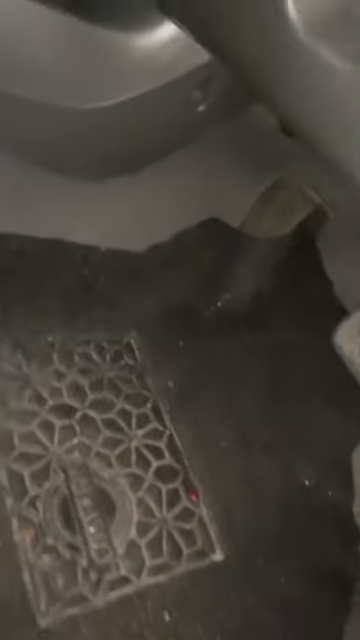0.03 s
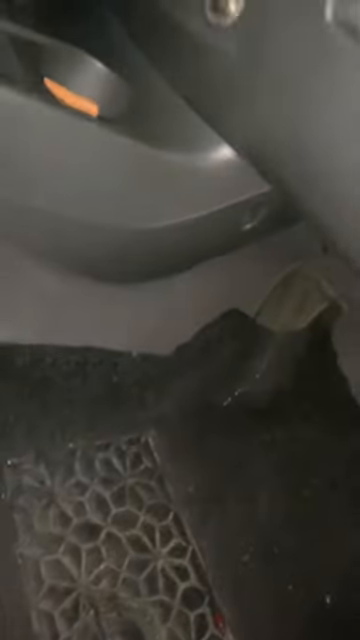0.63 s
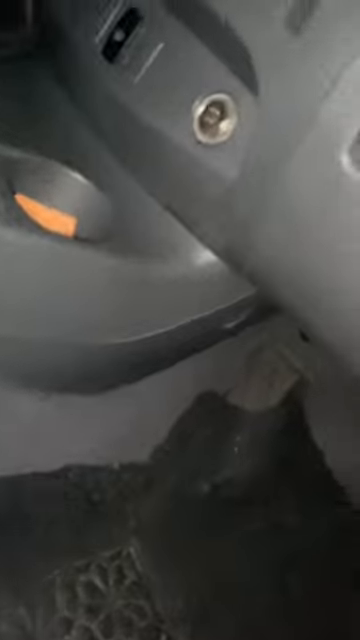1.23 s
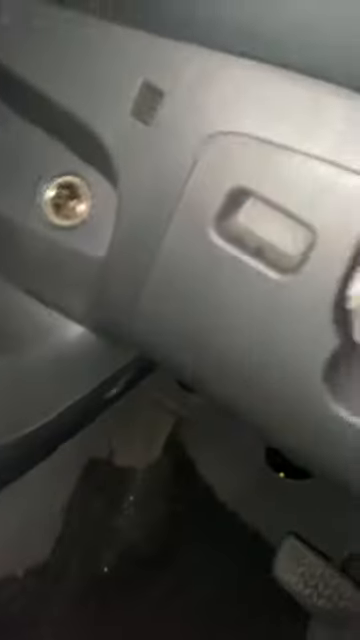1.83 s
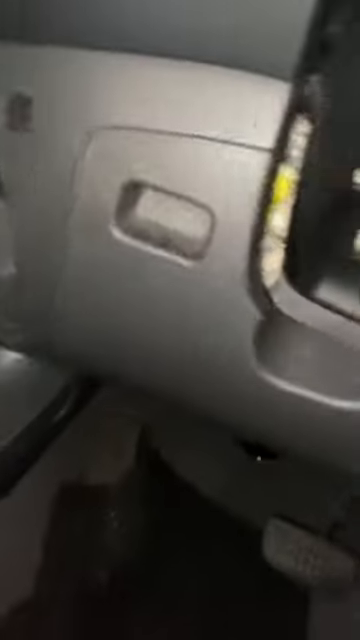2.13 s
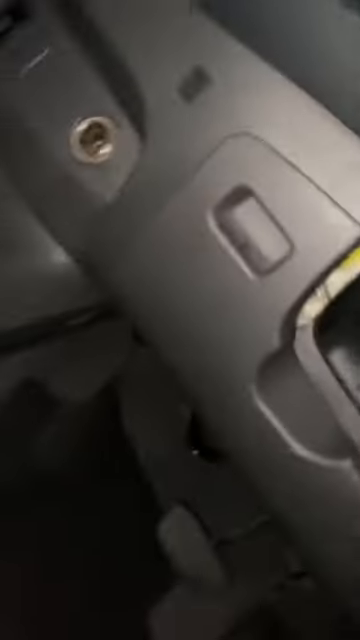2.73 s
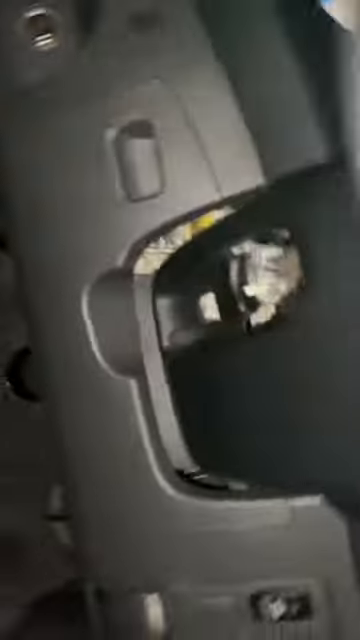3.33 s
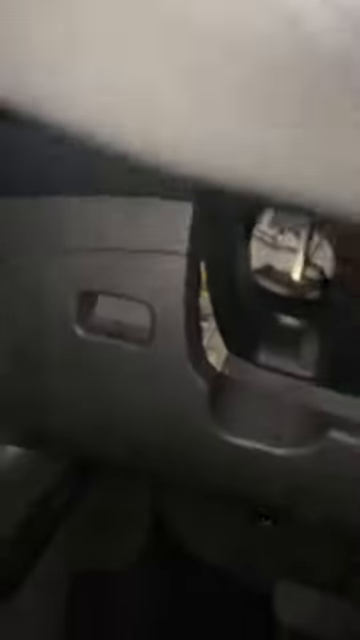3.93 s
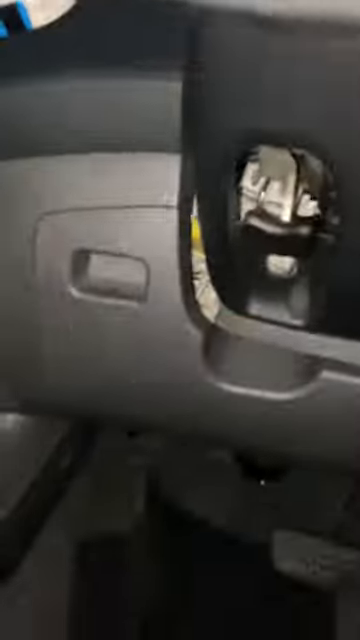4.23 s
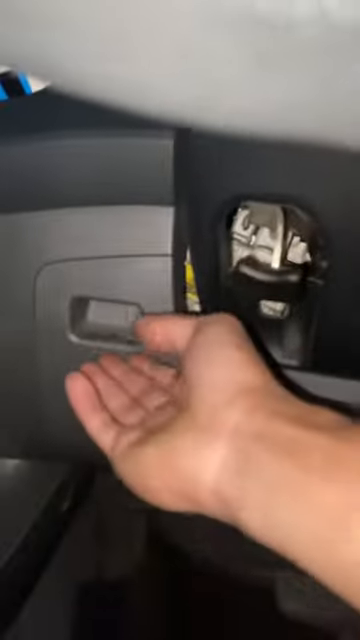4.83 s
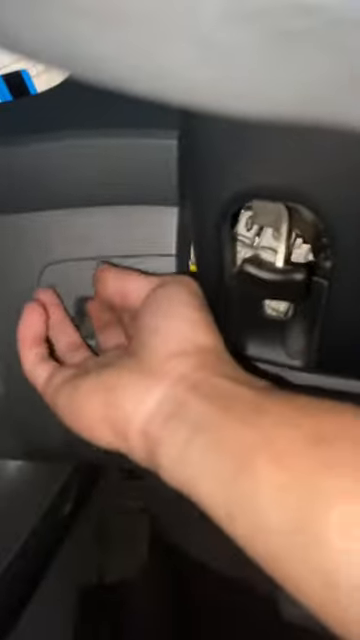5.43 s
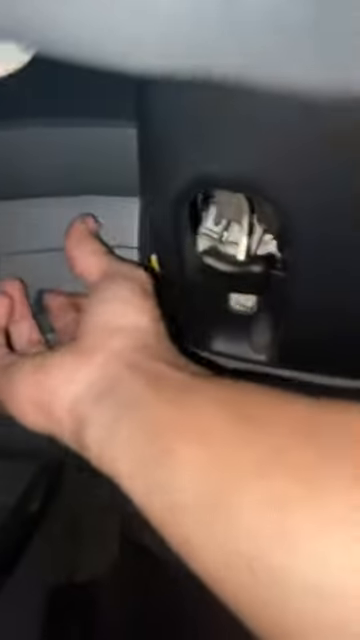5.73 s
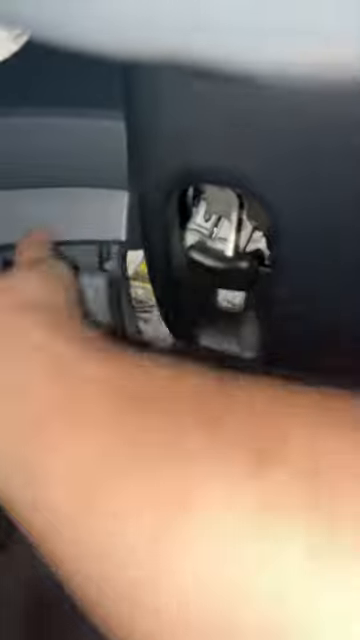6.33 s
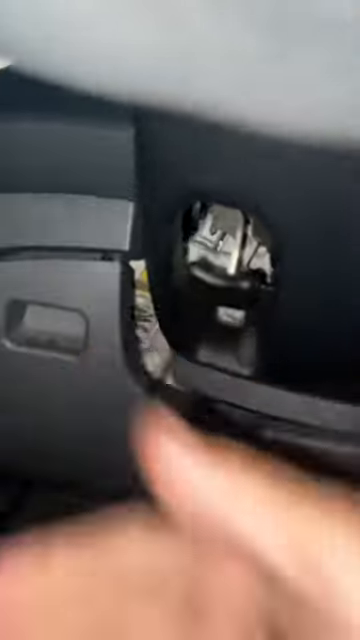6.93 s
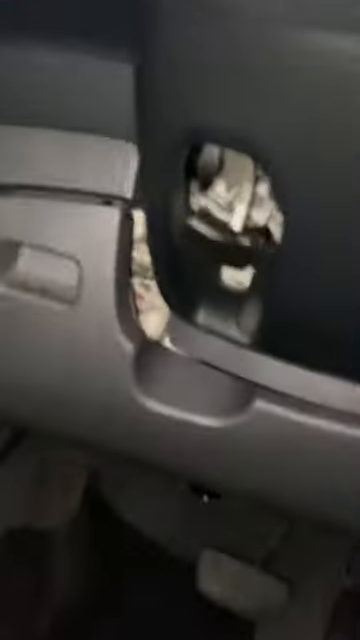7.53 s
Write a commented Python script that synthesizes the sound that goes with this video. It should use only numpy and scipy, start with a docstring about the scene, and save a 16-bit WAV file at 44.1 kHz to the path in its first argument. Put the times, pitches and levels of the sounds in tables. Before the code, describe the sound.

Inside a moving vehicle, a low engine boom sits over steady road rumble and tyre noise, with soft sleeve swishes and small trim ticks. The engine eases and a low drone swells. Fingers rub faintly on a plastic dash cover, which snaps out of its clips with a sharp clack, knocks against the hollow dash and clicks twice. The close, hand-held microphone picks up dull grip rubs and bumps.

```python
"""Inside a moving vehicle, by the driver's footwell. The engine's firing booms through the body over road
rumble and tyre noise, while a sleeve swishes and the trim ticks. By 3 s the engine has eased off and a
low drive-train drone is swelling. Near 5 s fingers rub a plastic dash cover; at 6.25 s it snaps out of
its clips, knocks against the hollow dash and clicks twice. Then the hand draws away.
A hand-held pair of close microphone ports picks it all up, with rubs and bumps of the grip."""
import sys
import numpy as np
from scipy import signal
from scipy.fft import rfft, irfft, next_fast_len
from scipy.io import wavfile
from scipy.ndimage import uniform_filter1d

SR = 44100
rng = np.random.default_rng(int(sys.argv[2]) if len(sys.argv) > 2 else 0)


def wav_record(signal):
    """Record a signal, one row per channel, as 16-bit PCM in the file named by sys.argv[1]."""
    frames = np.transpose(np.atleast_2d(signal))
    bounded = np.clip(frames, -1, 1)
    # unit amplitude maps onto the largest positive 16-bit level
    quanta = np.round(bounded * 32767).astype(np.int16)
    wavfile.write(sys.argv[1], SR, quanta)


N = 334719
TIME = np.arange(N) / SR

# tone of the floor rumble: f/Hz, level/dB
RUMBLE_EQ = [(15, -38), (28, -19), (42, 1.5), (55, 3.5), (70, 3.5), (95, 3), (125, -5.5), (155, -17.5),
             (210, -20), (300, -68), (600, -61.5)]
# smoother and coarser stretches of road: t/s, rumble level/dB, tyre level/dB
ROAD_SURFACE = [(0, -38.5, 0.54), (1.8, -36.5, 1), (3.2, -35.5, -0.2), (4, -35, 0), (4.75, -31.5, 2),
                (5.3, -33.5, 0.5), (6.1, -41, 4), (6.4, -33.5, 4), (6.9, -32, 1), (7.6, -33.5, 5.5)]
# tone of the tyre and wind noise: f/Hz, level/dB
TYRE_EQ = [(60, 0.5), (200, -2), (300, -5), (390, -10.5), (480, -7), (600, -8.5), (740, -14), (880, -14),
           (1120, -15.5), (1450, -18.5), (1900, -20), (2600, -20.5), (3200, -22), (4300, -25.5),
           (5200, -30.5), (6500, -31.5), (10000, -40.5), (13000, -40.5), (16000, -76)]
# tyre noise arriving from one side as the microphone turns: t/s, share/0-1
SIDE_SHARE = [(0, 0.46), (2.3, 0.2), (3.2, 0.19), (6.8, 0.37), (7.3, 0.48)]
# bands of tyre noise cancelled by a nearby surface: t/s, half length/s, f/Hz, width/oct, depth/0-1
TYRE_NOTCHES = [(1.76, 0.5, 3330, .2, 0.52), (1.75, 0.79, 500, 0.23, 0.39), (7.46, 0.4, 3170, 0.27, 0.5),
                (1.88, 0.064, 700, 0.59, 0.43), (2.22, 0.033, 640, 0.82, 1), (4.188, 0.013, 1200, 2, 0.95),
                (5.695, 0.043, 1800, 0.71, 0.84), (5.68, 0.06, 340, 0.3, .6), (7.38, 0.16, 325, 0.65, 0.68),
                (7.445, 0.052, 860, 0.82, 0.74)]
# partials of the drone: frequency ratio, level/dB
DRONE_PARTIALS = [(1, 0), (1.225, -5), (1.73, -11), (2.03, -10)]
# the firing boom comes and goes, builds under load and dies as the throttle lifts: t/s, level/dB
BOOM_ENVELOPE = [(.07, -31), (.17, -57), (.33, -51), (.43, -31.5), (.6, -58), (.73, -31.5), (.87, -32.5),
                 (1.11, -32), (1.21, -44), (1.37, -33.5), (1.54, -29.5), (1.72, -34), (2.16, -26.5),
                 (2.42, -29), (2.62, -33), (2.72, -51), (3, -80)]
# the boom's second harmonic: t/s, level/dB
HARMONIC_ENVELOPE = [(0, -48.5), (.7, -45.5), (1.1, -42.5), (1.5, -48.5), (1.63, -56.5), (1.9, -47),
                     (2.18, -45), (2.33, -67), (3.2, -72), (3.8, -71)]
# the grip tightens, rubbing the case and widening the image:
# t/s, rise/s, fall/s, rub level/dB, added spread/dB
GRIP_PRESSES = [(.71, 0.037, 0.048, -42.5, -7), (1.85, 0.085, .08, -49, 3.5),
                (2.27, 0.13, 0.11, -38.5, 9.5), (4.2, .025, 0.18, -53, 6), (5.668, 0.0051, 0.0095, -65, 59),
                (5.719, 0.051, 0.14, -56, 9), (6.42, 0.13, 0.23, -51, 6.5), (7.38, 0.12, 0.35, -35.5, 9)]
# the case creaks and bumps as the grip shifts: t/s, level/dB, tilt/(dB/oct)
CASE_BUMPS = [(1.571, -36, 0), (2.775, -35, 1), (4.09, -33, -3), (4.192, -26, -2), (4.332, -32, -2),
              (5.661, -22, -8), (6.371, -30, 2), (6.387, -40, 5), (6.522, -30, -2), (7.075, -32, -2),
              (7.17, -27, 1)]
# tone of the microphone's case: f/Hz, level/dB
CASE_EQ = [(20, -35), (45, -24), (70, -13), (100, 7), (140, 1.5), (200, -6), (300, -6.5), (700, -11.5),
           (1500, -19.5), (2400, -29), (4000, -65)]
# soft swishes of sleeve and air: t/s, level/dB, rise/s, fall/s, tilt/(dB/oct), spread/dB, grain/dB
SLEEVE_MOVES = [(.73, -42, 0.071, 0.079, -1, 1.5, 2), (.795, -37.5, 0.025, 0.077, 0, 1, 2.5),
                (.814, -36.5, 0.01, 0.012, -1.4, -1.5, 0), (.852, -39.5, 0.024, 0.0088, 0, 5, 4.5),
                (2.33, -49.5, 0.096, 0.078, 0.5, 4, 1.5), (2.5, -55.5, 0.033, 0.04, 6, 1, 3),
                (2.88, -50.5, 0.11, 0.11, 3, 1.5, 2), (3.7, -55, 0.38, 0.35, 0.5, .5, -3.5),
                (4.749, -50.5, 0.14, 0.16, -1, 0, 4), (5.848, -49, .069, 0.1, -1, 3, 3),
                (7.385, -58, .05, .015, 5, 4, 9), (7.401, -68, .49, .33, 0, 17, 1)]
# tone of the sleeve: f/Hz, level/dB
SLEEVE_EQ = [(100, -18), (300, 5.5), (450, 2), (650, 2.5), (900, -6), (1400, -1.5), (1900, -1),
             (2300, -5.5), (3200, -10.5), (3900, -5.5), (5700, -11), (8000, -17), (12500, -13.5),
             (16000, -31)]
# fingers rubbing on plastic: t/s, level/dB, rise/s, fall/s, f/Hz, width/oct
FINGER_RUBS = [(4.78, -57, 0.11, 0.13, 1600, 0.6), (4.9, -56, 0.23, 0.38, 3000, 0.36),
               (5.1, -61, .3, 0.43, 890, 0.25), (7.22, -61, 0.083, .08, 1990, 0.23),
               (7.36, -51, 0.029, 0.044, 2340, .4)]
# ticks of trim, fingernail and clips: t/s, level/dB, f/Hz, width/oct, t60/s, pan left/dB, snap level/dB
TRIM_TICKS = [(.5628, -31.5, 400, 0.65, 0.04, 3, -64), (.5635, -35, 1900, 0.42, 0.029, 4, -70),
              (1.31, -56, 11000, .5, .08, 0, -56), (1.384, -50, 10000, .66, 0.0041, 2, -46),
              (2.1467, -30.5, 620, 0.3, .07, 1, -58), (2.262, -36, 700, .4, .09, 0, -70),
              (2.805, -35, 500, .4, .05, 0, -62), (2.8056, -33, 1850, 0.45, 0.02, 3, -52),
              (4.078, -38, 1180, 1.3, 0.035, -6, -52), (4.182, -47, 7500, 0.46, .012, 4, -55),
              (4.2014, -41.5, 1000, 0.99, 0.054, -3, -60), (4.519, -45, 13200, .5, .02, -3, -50),
              (4.626, -46, 4970, 1, .02, -3, -53), (4.867, -43, 3400, 0.4, .025, -4, -65),
              (5.656, -34.5, 8240, 0.088, 0.01, 5, -49), (5.682, -53.5, 8100, .05, 0.66, 4, -40),
              (5.736, -49, 8300, .1, .02, 0, -52), (6.244, -44, 3500, 1, 0.068, 0, -55),
              (6.2648, -18, 1950, .3, .03, 0, -45), (6.316, -42, 4500, 1, .02, 9, -47),
              (6.343, -46, 5000, 1, .03, 0, -51), (6.422, -45, 2200, .8, .08, 0, -65),
              (6.4335, -39.5, 3400, .2, 0.053, 0, -50), (6.589, -48, 5000, .4, .08, 0, -62),
              (6.5982, -31, 2250, 0.22, 0.018, 0, -42), (6.5988, -31, 4950, 0.13, 0.024, -1, -35),
              (6.6035, -42, 4000, .8, .02, 0, -50), (6.6316, -32, 2500, 0.35, 0.022, -2, -42),
              (6.632, -38, 4900, .25, .035, -1, -48), (6.642, -43, 3500, .8, .025, 0, -54),
              (6.652, -37.5, 1680, .6, 0.04, 1, -68), (7.161, -39, 1500, 1.4, 0.056, 3, -50)]
# knocks of the loosened cover: t/s, level/dB, f/Hz, width/oct, pan left/dB
COVER_KNOCKS = [(6.2626, -30, 990, 0.26, 2), (6.274, -19, 148, 0.89, -7), (6.281, -25, 233, .4, 0),
                (6.325, -28, 950, .4, -2), (6.336, -22, 68, .6, 3), (6.4439, -23.5, 1150, 0.65, -5),
                (6.458, -28, 235, 1, 5)]
# modes of the loose cover over the hollow dash: f/Hz, level/dB, t60/s
HOLLOW_MODES = [(71.5, 1.5, 0.18), (124, -1, 0.087), (174, -8, 0.13), (218, 1.5, 0.065), (269.6, 0, 0.091),
                (996, -12, .06), (1100, -6, 0.048), (1306, -6, 0.04)]
# blows on the cover as its clips let go: t/s, level/dB, tilt/(dB/oct), ring trim/dB, pan left/dB
CLIP_BLOWS = [(6.252, -31, 0.5, 1, 14), (6.258, -14.5, -0.5, 0.5, -7), (6.265, -26, 2.5, -7, 0),
              (6.2691, -22, 1, -12, 9), (6.2745, -26, -2, -21, 1), (6.279, -25, -2, -18, 1),
              (6.323, -36, -1, -10, -8), (6.333, -36, -2, -15, 4), (6.433, -36, 0, -2, 0),
              (6.446, -32, -2.5, -18, -6)]
# modes of the cover and the dash behind it: f/Hz, level/dB, t60/s
PANEL_MODES = [(62, -14, .3), (123, -3.5, .12), (175, -12, .11), (222, -7, .11), (262, -14, .1),
               (384, -3.5, .07), (458, -1.5, .065), (535, -7, .06), (650, -10, .07), (810, -7.5, .1),
               (893, -13, .08), (996, -13, .11), (1107, -16, .08), (1351, -16, .08), (1558, -14, .09),
               (1805, -7, .07), (1926, -10.5, .07), (2374, -7, .07), (2734, -18, .08), (3018, -17, .08),
               (3782, -18, .07), (5620, -23, .05), (10455, -24, .07)]
# tone of the plastic's dense crack: f/Hz, level/dB
CRACK_EQ = [(30, -21), (70, -5), (130, 3.5), (400, 1.5), (1000, -6.5), (1400, -16), (2400, -8.5),
            (3500, -15.5), (5500, -18.5), (8000, -24), (12000, -20), (16000, -36)]
# response of the ports to the sum of the two sides: f/Hz, level/dB
MID_EQ = [(18, -31), (30, -4), (42, -1.5), (2000, -0.5), (3000, -2.5), (6200, -2.5), (7300, -17.5),
          (8600, -2.5), (10000, -3.5), (12100, -9), (13200, -33), (15500, -8)]
# response of the ports to the difference of the two sides: f/Hz, level/dB
SIDE_EQ = [(50, -37), (110, -35), (200, -12.5), (450, -1), (680, 0.5), (900, 5), (1900, -3.5), (2600, 0),
           (3800, -2), (4600, 0), (5300, -4.5), (7000, -0.5), (9300, -6), (10400, -45), (12300, -7.5)]


def amp(db):
    """Decibels to gain."""
    return 10 ** (np.asarray(db) / 20)


def unit(x):
    """Scales to an rms of one."""
    return x / np.sqrt(np.mean(x ** 2) + 1e-20)


def automation(rows):
    """The columns of a time table at every sample."""
    s, *columns = np.transpose(rows)
    return [np.interp(TIME, s, c) for c in columns]


def eq(points, hz):
    """An EQ curve in dB, drawn on a log-frequency axis."""
    f, db = np.transpose(points)
    return np.interp(np.log(hz + 1), np.log(f + 1), db)


def octaves(hz):
    """Octaves above one kilohertz."""
    return np.log2((hz + 1) / 1000)


def bell(hz, centre_hz, width):
    """One broad resonance in dB, its width in octaves."""
    return -20 * np.log10(1 + ((octaves(hz) - octaves(centre_hz)) / width) ** 2)


def colour(x, db_at):
    """Filters by a gain in dB given as a function of frequency."""
    size = next_fast_len(x.shape[-1] + 1024)
    gain = amp(db_at(np.fft.rfftfreq(size, 1 / SR)))
    return irfft(rfft(x, size) * gain, size)[..., :x.shape[-1]]


def noise(db_at, size=N):
    """Two unrelated channels of coloured noise, rms one."""
    return unit(colour(rng.standard_normal((2, size)), db_at))


def wander(rate_hz):
    """Slow random motion, rms one."""
    spectrum = rfft(rng.standard_normal(2048))
    hz = np.arange(len(spectrum)) / TIME[-1]
    slow = unit(irfft(spectrum * np.exp(-(hz / rate_hz) ** 2)))
    return np.interp(TIME, np.linspace(0, TIME[-1], len(slow)), slow)


def grains(t, depth_db, rate_hz):
    """The uneven catching and slipping of a surface, as a gain of rms one."""
    roughness = np.interp((t - t[0]) * rate_hz, np.arange(len(t)), rng.standard_normal(len(t)))
    return unit(amp(depth_db * np.clip(roughness, -2, 2)))


def attack(t, rise_s):
    """Eases in from zero to one."""
    return 1 - np.exp(-t / rise_s)


def decay(t, t60):
    """Falls by 60 dB in t60 seconds."""
    return np.exp(-np.log(1000) * t / max(t60, 1e-3))


def swell(t, rise, fall):
    """A rounded peak of height one at t = 0, with exponential flanks."""
    return np.exp(.4 - np.hypot(t / np.where(t < 0, rise, fall), .4))


def since(s):
    """Seconds gone by since a moment, zero before it."""
    return np.maximum(TIME - s, 0)


def ringing(t, modes, db_at):
    """Struck modes: damped sines of alternating polarity, weighted by frequency."""
    return sum(amp(db + db_at(hz)) * decay(t, t60) * np.sin(2 * np.pi * hz * t) * (-1) ** k
               for k, (hz, db, t60) in enumerate(modes))


def mid_side(x):
    """Turns left and right into mid and side, or back."""
    return np.array([x[0] + x[1], x[0] - x[1]]) / np.sqrt(2)


def widen(x, spread_db):
    """Sets the stereo width by trading mid against side."""
    mid, side = mid_side(x)
    spread = amp(spread_db)
    return mid_side([mid, side * spread]) * np.sqrt(2 / (1 + spread ** 2))


def from_right(x, share, delay_samples=8):
    """Part of the sound arrives from the right and reaches the left port late."""
    left = share * np.roll(x[1], delay_samples) + np.sqrt(1 - share ** 2) * x[0]
    return np.array([left, x[1]])


def add(mix, s, sound, pan_db=0):
    """Places a sound in the mix; pan is left minus right."""
    part = mix[:, round(s * SR):][:, :sound.shape[1]]
    part += sound[:, :part.shape[1]] * amp([[pan_db / 2], [-pan_db / 2]])


def road_rumble(compression=0.56):
    """The road shakes the floor and the cabin air booms."""
    bed = noise(lambda hz: eq(RUMBLE_EQ, hz))
    envelope = np.sqrt(np.abs(uniform_filter1d(bed.sum(0) ** 2, size=6000)) + 1e-9)
    return np.sqrt(2) * amp(automation(ROAD_SURFACE)[0]) * unit(bed / envelope ** compression)


def band_drift(x, depth_db=.9, rate_hz=9):
    """Each band of a noise swells and sinks a little on its own."""
    centres, size = np.linspace(-3, 4, 12), next_fast_len(N)
    spectrum, hz = rfft(x, size), np.fft.rfftfreq(size, 1 / SR)
    octave = np.clip(octaves(hz), centres[0], centres[-1])
    bands = (np.maximum(1 - abs(octave - c) / (centres[1] - centres[0]), 0) for c in centres)
    return sum(irfft(spectrum * band, size)[:, :N] * amp(depth_db * wander(rate_hz)) for band in bands)


def surface_notches(x):
    """Bands of a noise sink while the microphone is close to a surface."""
    size = next_fast_len(N)
    spectrum, hz = rfft(x, size), np.fft.rfftfreq(size, 1 / SR)
    for s, half_length, centre_hz, width, depth in TYRE_NOTCHES:
        band = irfft(spectrum * amp(bell(hz, centre_hz, width)), size)[:, :N]
        x = x - depth * np.exp(-((TIME - s) / half_length) ** 2) * band
    return x


def grip(rest_db=-70):
    """Each press on the case comes and goes smoothly: returns rub gain and added spread in dB."""
    rub, spread_db = amp(rest_db), 0
    for s, rise, fall, rub_db, added_db in GRIP_PRESSES:
        pressure = swell(TIME - s, rise, fall)
        rub = rub + amp(rub_db) * pressure
        spread_db = spread_db + added_db * pressure
    return rub, spread_db


def tyre_noise(gain_db=-43, flutter_db=.55, press_lift_db=5, firm_press_db=12.5):
    """An even bed of tyre and wind noise that widens and lifts under a firm grip."""
    share, press_db = automation(SIDE_SHARE)[0], grip()[1]
    level_db = automation(ROAD_SURFACE)[1] + press_lift_db * np.tanh(press_db / firm_press_db) ** 2
    spread_db = -3.5 + 4.5 * share + press_db  # narrow from ahead, wider from the side
    bed = band_drift(noise(lambda hz: eq(TYRE_EQ, hz)))
    bed = from_right(surface_notches(bed), share)
    hiss = colour(bed, lambda hz: eq([(3000, -19), (5000, -5), (7500, 4)], hz))
    body = widen(bed - hiss, spread_db)
    top = widen(hiss, 0.2 * spread_db) * amp(np.interp(TIME, [.3, 1.2], [-3, 0]))  # opens up early on
    return amp(gain_db + level_db + flutter_db * wander(28)) * (body + top)


def drive_train_drone(low_hz=54.5, high_hz=57.3, step_s=5.8, peak_s=6.35, peak_db=-32.5, waver_db=1.5):
    """Low wavering partials of drive train and wheels swell, step up in pitch and recede."""
    hz = low_hz + (high_hz - low_hz) * (1 + np.tanh((TIME - step_s) / .35)) / 2
    level_db = peak_db - 9 * np.maximum(peak_s - TIME, 0) - 6.5 * since(peak_s)  # slopes in dB/s
    phase = 2 * np.pi * np.cumsum(hz * (1 + 0.0014 * wander(3.2))) / SR
    return np.sqrt(2) * sum(amp(level_db + db + waver_db * wander(2.2)) * np.sin(ratio * phase)
                            for ratio, db in DRONE_PARTIALS)


def engine(start_hz=81.6, top_hz=87.7, pull_s=1.15, pull_shape=1.656):
    """Firing orders climb under load to where the cabin booms, then fade as the throttle is eased."""
    firing_hz = top_hz - (top_hz - start_hz) * np.exp(-(TIME / pull_s) ** pull_shape)
    phase = 2 * np.pi * np.cumsum(firing_hz * (1 + 0.0019 * wander(6.2))) / SR
    orders = [(1, automation(BOOM_ENVELOPE)[0]),
              (1.5, -48 + 2 * wander(5.3) - 60 * since(3.3)),
              (2, automation(HARMONIC_ENVELOPE)[0]),
              (3, -54 - 9 * TIME)]
    return np.sqrt(2) * sum(amp(db) * np.sin(order * phase) for order, db in orders)


def handling(bump_t60=0.064, uneven_db=1.0):
    """Dull rubs and bumps of the hand on the microphone's case, in one channel."""
    bumps, t = np.zeros((2, N)), np.arange(SR // 5) / SR
    for s, db, tilt in CASE_BUMPS:
        thud = noise(lambda hz: eq(CASE_EQ, hz) + tilt * octaves(hz), len(t))
        add(bumps, s, amp(db) * thud * decay(t, bump_t60) * attack(t, 0.00092))
    rub = noise(lambda hz: eq(CASE_EQ, hz)) * grip()[0] * amp(uneven_db * wander(25))
    return (bumps + rub)[0]


def sleeve_swishes(grain_hz=260):
    """Cloth and air swell and drop away; some swishes have a grainy scrape."""
    out, t = np.zeros((2, N)), np.arange(-SR // 2, SR) / SR
    for s, db, rise, fall, tilt, spread_db, grain_db in SLEEVE_MOVES:
        rush = widen(noise(lambda hz: eq(SLEEVE_EQ, hz) + tilt * octaves(hz), len(t)), spread_db)
        add(out, s + t[0], amp(db) * swell(t, rise, fall) * grains(t, grain_db, grain_hz) * rush)
    return from_right(out, share=0.57)


def finger_rubs(scratch_db=6.5, slip_hz=170):
    """Skin catches and slips on the grained plastic, in the cover's recess and as the hand draws away."""
    out, t = np.zeros((2, N)), np.arange(-SR, SR) / SR
    for s, db, rise, fall, centre_hz, width in FINGER_RUBS:
        rub = noise(lambda hz: bell(hz, centre_hz, width), len(t)) * grains(t, scratch_db, slip_hz)
        add(out, s + t[0], amp(db) * swell(t, rise, fall) * rub)
    return out


def trim_ticks(edge=0.53, edge_t60=0.002, snap_hz=8000, snap_t60=0.0046):
    """Light contacts: a bright snap over one resonant burst, whose attack is softer the lower it is."""
    out, t = np.zeros((2, N)), np.arange(SR // 3) / SR
    for s, db, centre_hz, width, t60, pan_db, snap_db in TRIM_TICKS:
        burst = noise(lambda hz: bell(hz, centre_hz, width), len(t))
        onset = 1 - np.exp(-(t * centre_hz) ** 2)
        envelope = onset * (decay(t, t60) + edge * decay(t, edge_t60))
        snap = noise(lambda hz: bell(hz, snap_hz, width=1.5), len(t)) * decay(t, snap_t60)
        add(out, s, widen(amp(db) * burst * envelope + amp(snap_db) * snap, spread_db=1), pan_db)
    return out


def cover_knocks(contact_s=0.00046):
    """The loose cover knocks on the hollow dash; where it lands decides which modes speak."""
    out, t = np.zeros((2, N)), np.arange(SR // 3) / SR
    for s, db, centre_hz, width, pan_db in COVER_KNOCKS:
        ring = ringing(t, HOLLOW_MODES, lambda hz: 2 * bell(hz, centre_hz, width))
        add(out, s, amp(db) * np.array([ring, ring]) * attack(t, contact_s), pan_db)
    return widen(out, spread_db=-3)


def cover_snap(ring_db=-1, crack_t60=0.099, contact_s=0.00021):
    """The clips let go in a quick burst; every blow crunches and rings the same plastic."""
    out, t = np.zeros((2, N)), np.arange(SR // 3) / SR
    for s, db, tilt, trim_db, pan_db in CLIP_BLOWS:
        ring = amp(ring_db + trim_db) * ringing(t, PANEL_MODES, lambda hz: tilt * octaves(hz))
        crunch = rng.standard_normal((2, len(t))) * grains(t, depth_db=3, rate_hz=1500)
        crunch = unit(colour(crunch, lambda hz: eq(CRACK_EQ, hz) + tilt * octaves(hz)))
        crack = widen(crunch, spread_db=-2) * decay(t, crack_t60)
        add(out, s, amp(db) * (ring + crack) * attack(t, contact_s), pan_db)
    return out


def cabin_reverb(x, wet_db=-13, t60=0.16):
    """The short, padded echo of the cabin."""
    t = np.arange(SR // 3) / SR
    tail = rng.standard_normal((2, len(t))) * decay(t, t60) * attack(t, 0.0024)
    return x + amp(wet_db) * signal.fftconvolve(x, tail / np.linalg.norm(tail[0]), axes=1)[:, :N]


def scene():
    """The driving bed and the hand's movements stay dry; the plastic hits get the cabin's echo."""
    bed = engine() + drive_train_drone() + road_rumble() + tyre_noise()
    movement = sleeve_swishes() + finger_rubs()
    return bed + movement + cabin_reverb(cover_snap() + cover_knocks() + trim_ticks())


def record(dry, cutoff_hz=15700):
    """The close ports make the bass mono and comb the treble; the flexing case moves them oppositely."""
    mid, side = mid_side(dry)
    mid = colour(mid, lambda hz: eq(MID_EQ, hz))
    side = colour(side, lambda hz: eq(SIDE_EQ, hz)) + np.sqrt(2) * handling()
    low_pass = signal.firwin(511, cutoff_hz, window=("kaiser", 9), fs=SR)
    return signal.oaconvolve(mid_side([mid, side]), low_pass[None], "same")


dry = scene()
out = record(dry)
wav_record(out)
```